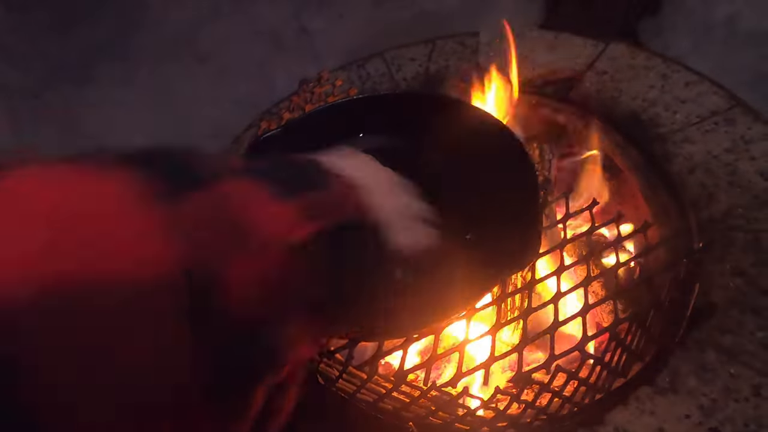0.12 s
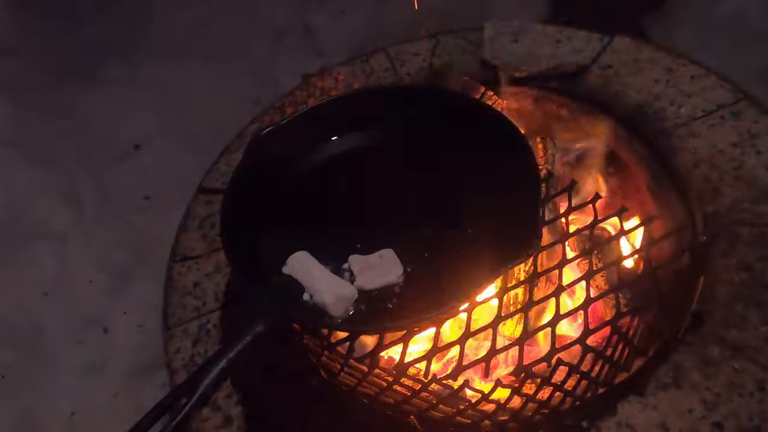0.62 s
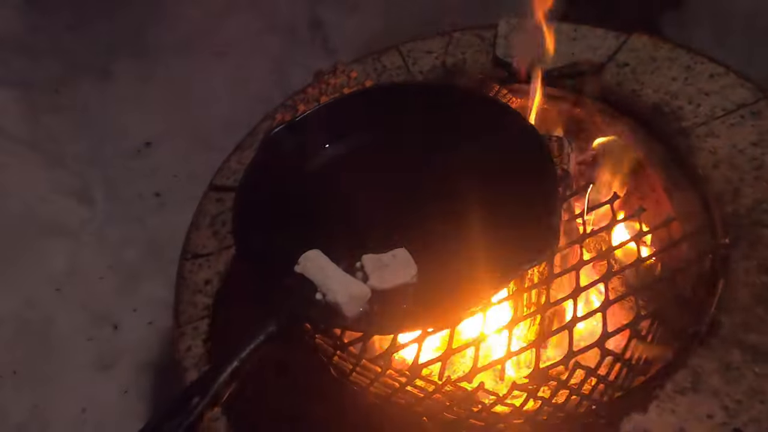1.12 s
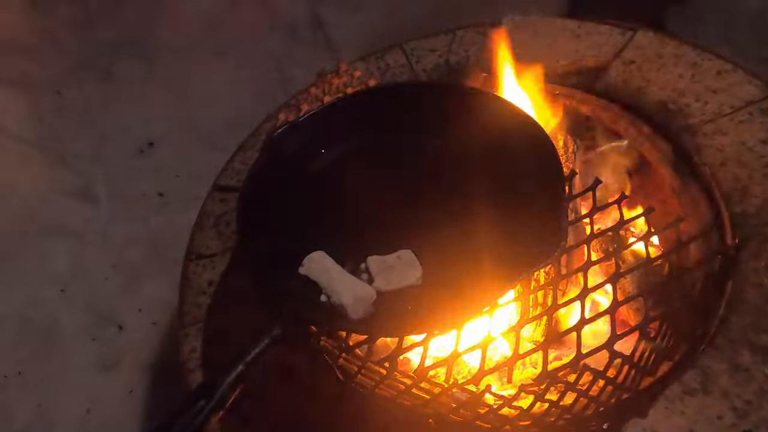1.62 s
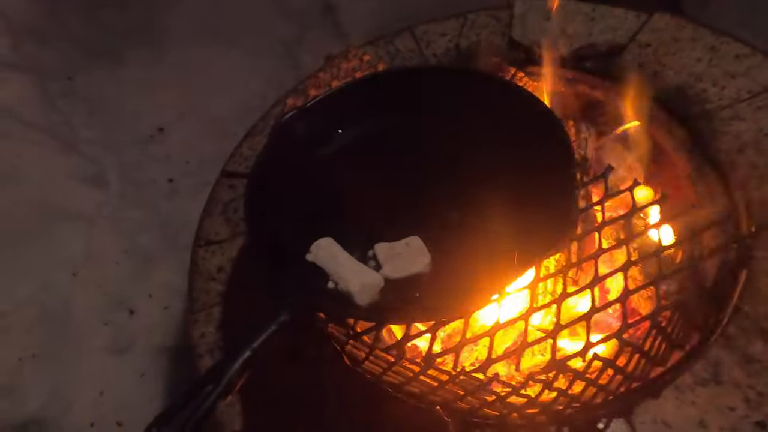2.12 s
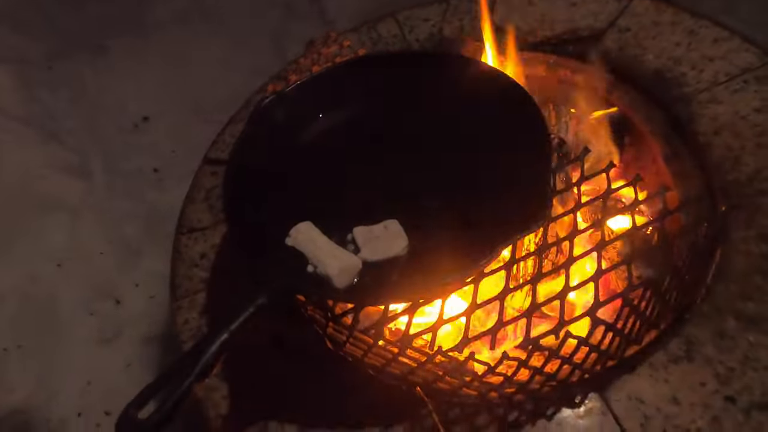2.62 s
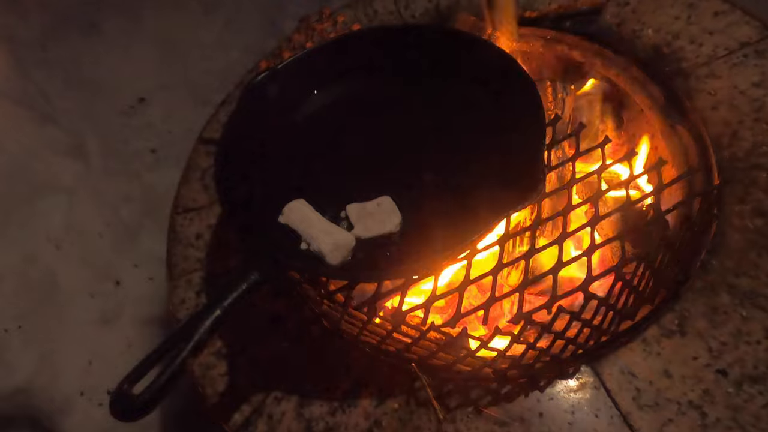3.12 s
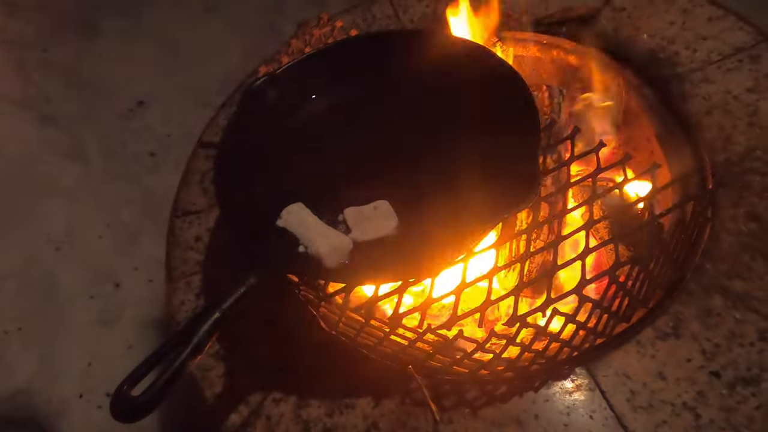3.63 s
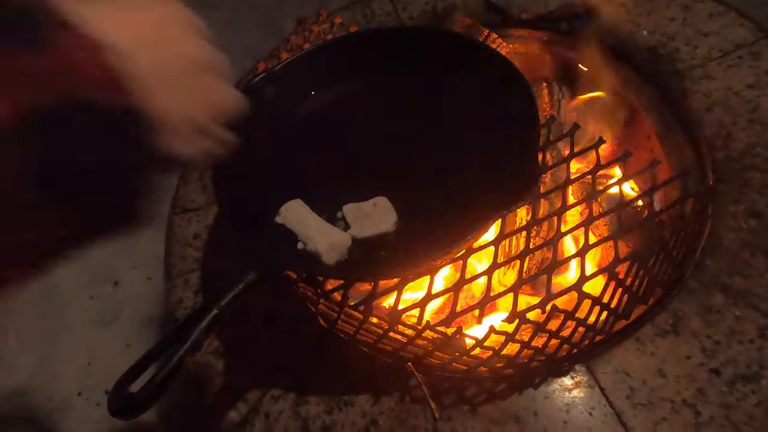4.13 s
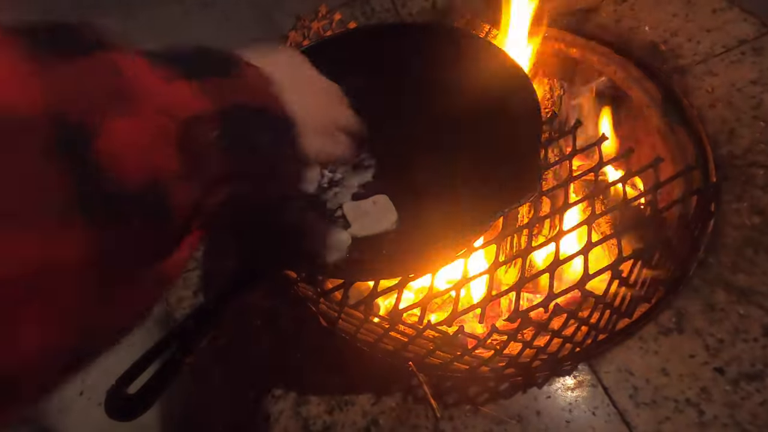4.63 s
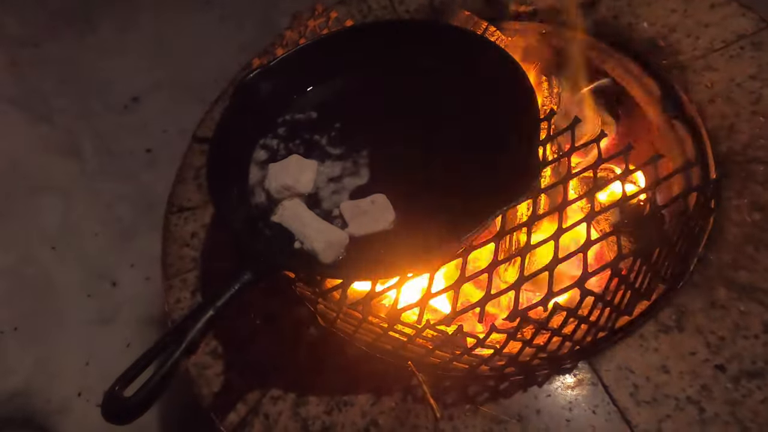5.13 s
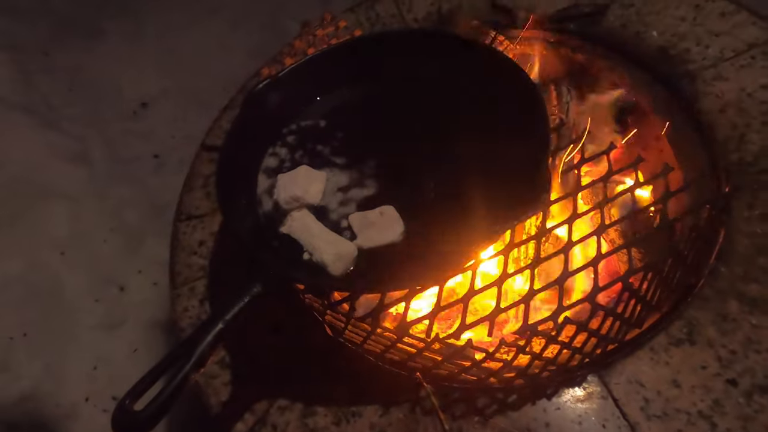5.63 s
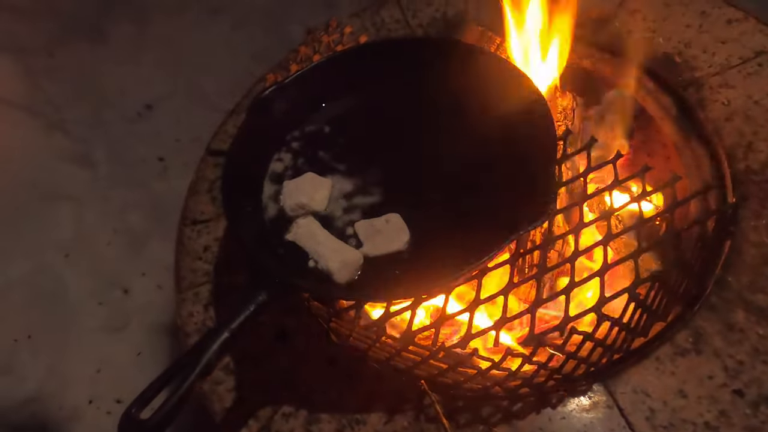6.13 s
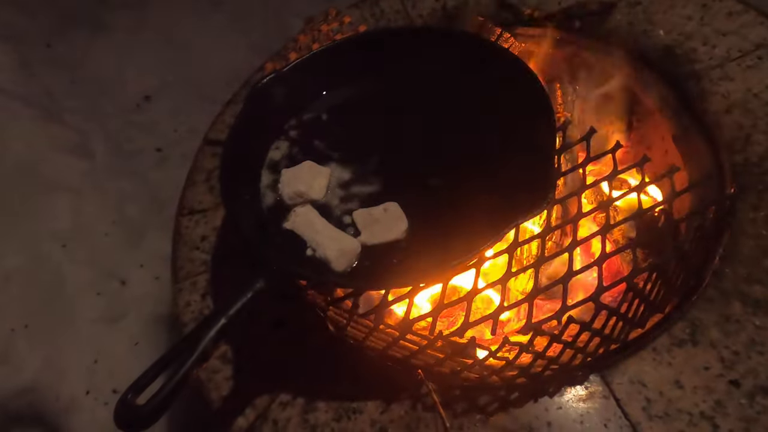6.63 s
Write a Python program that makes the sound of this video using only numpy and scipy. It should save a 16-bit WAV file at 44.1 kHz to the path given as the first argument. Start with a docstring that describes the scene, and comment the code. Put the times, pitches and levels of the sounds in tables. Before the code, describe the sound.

Close, dry outdoor fire pit with an iron pan of fat on the grate. After a quiet start, sharp log snaps burst out thickly around half a second to two seconds, thin to a sputtering sizzle, then crowd again just after five seconds. Flames flutter and roar softly underneath. The stereo picture begins narrow and widens.

```python
"""Logs snap and spit in a wood fire in an outdoor stone pit, heard dry, without echo, on a microphone pair.
Snaps are short noise bursts in bands, listed or at random, over a bed of grainy noise that swells now and then.
Fat sizzles in an iron pan on the grate: hissing noise and ringing droplets, with faint pan resonances.
Flames flutter and roar low as filtered noise, and one small metal part pings as decaying sines.
The stereo picture starts narrow and opens up."""
import sys
import numpy as np
from scipy import signal
from scipy.fft import rfft, irfft
from scipy.io import wavfile

SR = 44100
rng = np.random.default_rng(int(sys.argv[2]) if len(sys.argv) > 2 else 0)


def int16_out(signal):
    """Quantize to a 16-bit WAV file."""
    q = np.round(np.clip(np.atleast_2d(signal).T, -1, 1) * 32767)
    wavfile.write(sys.argv[1], SR, q.astype(np.int16))


def volts(x):
    """Linear amplitude factor 10**(x/20) for a level x in dB, scalar or array-like."""
    e = np.asarray(x, float) / 20
    return 10 ** e


N = 297675  # samples

SMALL_PER_S = 9
SMALL_OCTAVES, SMALL_FALL_DB, SMALL_LENGTHS = (0.9, 1.87), 7.5, (0.83, 4.0)
CALM_DB = -6.5  # small snaps lose this much when the bed is even


def small_snaps(vigour_db, unrest):
    """Rows of chance snaps, as loud as the fire is lively and fitful; columns as in LOUD_SNAPS."""
    when, size, colour, length = rng.random((int(SMALL_PER_S * N / SR), 4)).T
    bed_db = vigour_db + CALM_DB * (1 - unrest)
    level_db = bed_db[(when * N).astype(int)] + 0.5 + 0.5 * np.log(1 - .95 * size)
    octave = np.interp(colour, (0, 1), SMALL_OCTAVES)
    fall_db = np.full(len(when), SMALL_FALL_DB)
    lengths = np.interp(length ** 2, (0, 1), SMALL_LENGTHS)  # mostly short
    return list(zip(when * N / SR, level_db, octave, fall_db, lengths))


# The loud snaps of the logs. Each row: start in seconds, level at the colour centre in dB (energy as rms over
# 10 ms), colour centre in octaves above 1 kHz (kept within the bands), fall one octave away in dB (at least
# 0.5), length figure (nominal ms; sets the rise and, through a power, the decay).
LOUD_SNAPS = [(0.0804, -51.0, 1.8, 3.5, 3.2), (0.09, -53.5, 1.2, 2, 4.6), (0.2285, -48, 1.25, 12, 5.2),
              (0.3286, -48.5, -0.5, 1.5, 3.5), (0.3703, -49, 1.5, 8, 9.5), (0.4044, -55, 1.9, 3, 2.4),
              (0.4123, -68, 5, -3, 5.6), (0.4798, -55.5, 0.5, 1, 2), (0.5247, -54, 0.5, 3.5, 6.7),
              (0.5793, -49, 0.7, 1, 6.8), (0.6005, -42, 1.2, 2, 11), (0.6176, -38.5, -0.1, 2, 5),
              (0.6491, -38, 1.0, 2.0, 8.3), (0.6637, -33, -0.5, 3, 7.2), (0.708, -38, 2, 12.5, 3.5),
              (0.7446, -44.5, 0.6, 1.5, 7.2), (0.7896, -52, -1, -0.5, 5.1), (0.8072, -42, 0.1, 1.5, 7.3),
              (0.8155, -51.5, 2, 3.0, 3.4), (0.824, -59, 0.1, -1, 5.8), (0.9051, -44, -3.5, -2.5, 12),
              (0.915, -39.5, 1.5, 1, 3.9), (0.925, -40.0, 0.5, 2, 3.4), (0.9555, -51, 0, 5.0, 3.9),
              (0.9706, -36, -0.26, 9, 3.3), (0.9794, -50, -1.5, 1.5, 12), (0.9854, -45, 2.6, 1.5, 4.5),
              (1.0232, -48.5, 1, 2, 5.0), (1.0885, -27.5, -0.57, 1.5, 2.9), (1.097, -37.5, 1, 2, 5.4),
              (1.1121, -53, 2.3, 5, 5.9), (1.1212, -38.5, 1.2, 1.5, 7.6), (1.1322, -55, -2, 4.5, 7.7),
              (1.1425, -43, -1, 3.5, 3), (1.1579, -30.5, 0.5, 2, 5.5), (1.18, -44.5, -0.3, 0.5, 9.1),
              (1.2734, -45.5, 0.5, 2.5, 3.8), (1.2946, -46.5, -0.3, 0.5, 3.3), (1.3059, -47, -1.3, 1, 1.7),
              (1.3131, -46, 1.3, 2.0, 3.3), (1.3223, -49, -0.5, 3, 2.1), (1.3306, -42.5, 0.5, 1, 3.8),
              (1.3548, -50, 2.6, 5, 2.4), (1.4214, -45.5, 0.3, 2.5, 4.4), (1.4495, -33.5, 0.5, 1.0, 5),
              (1.4789, -42.5, 0.5, 6.0, 3.3), (1.4938, -39.5, -0.5, 6.5, 4.4), (1.5129, -36, 1.3, 2.5, 3.7),
              (1.5272, -49, 1.2, 2, 2.8), (1.551, -41.5, 1.6, 2, 3.4), (1.5575, -37.5, 1.24, 5, 2.2),
              (1.5748, -53, 1.8, 5.0, 2.8), (1.5812, -47, 0, 2, 3.2), (1.6021, -43.5, -0.5, 3.5, 8.8),
              (1.6118, -51, 1.5, 2.5, 4.5), (1.6204, -52.5, 2.0, 1.5, 2.5), (1.6275, -55.5, 1.0, 2, 2.2),
              (1.6467, -48, 1.5, 4, 5.1), (1.6778, -49.5, 1.0, 2, 4.2), (1.6912, -50, 0.2, 1.5, 4.7),
              (1.7165, -41, 2, 6, 9.8), (1.7524, -49.5, 0, 4, 3.5), (1.7601, -59, 3.1, 3, 1.5),
              (1.8206, -46, 1.5, 2, 2.8), (1.8279, -55, 0.5, -2, 2.5), (1.8511, -54.0, 1.9, 12, 5.8),
              (1.8583, -48, 1.5, 8, 3.6), (1.8782, -59, 4.5, 6, 2.2), (1.9008, -44.5, -0.3, 2, 4.7),
              (1.912, -47, 1.5, 9, 1.9), (1.9213, -54, 0.3, 1.5, 1.5), (1.9311, -41.5, 1.55, 6.5, 3.4),
              (1.9394, -46.0, 2.1, 7, 6.7), (1.9676, -52, 1, 8, 2.7), (1.98, -56.0, 2.4, 9, 2.7),
              (2.0151, -44, 1.54, 3.5, 2.4), (2.023, -57.5, 1.2, 0.5, 3.1), (2.0484, -68.0, 3.2, 7, 2.3),
              (2.0595, -49, 3.2, 3.5, 3.2), (2.0756, -62, 2.6, 1.0, 2.6), (2.111, -47.5, 1.5, 2.5, 5.5),
              (2.1176, -56, 1, 9, 5.8), (2.1597, -34, 1.0, 3, 4.2), (2.2008, -56, 0.1, 1.5, 3.7),
              (2.238, -46, 0.5, 3.5, 3.1), (2.269, -57, 1.1, 4.5, 2.9), (2.285, -49, 1.04, 5, 2.1),
              (2.3076, -49.0, 1.1, 3, 3.1), (2.3191, -56, 1.5, 4, 5.9), (2.3714, -50.5, 0.5, 2, 3.6),
              (2.3824, -64, 2, 0, 2.9), (2.413, -44, 1.73, 8.5, 2.8), (2.4379, -53, -0.1, 0.5, 3.6),
              (2.4552, -41.5, 1.8, 1, 3.1), (2.4934, -62, 3.2, 3, 2.5), (2.5159, -53, 3.1, 4.0, 2.8),
              (2.5529, -58, -1, 6, 2.9), (2.5617, -51.5, 0.0, 1.5, 2.9), (2.5879, -57, -5, 3, 2.9),
              (2.6035, -44, 1.9, 5, 3.9), (2.6851, -55.5, 0.1, 2.5, 3.2), (2.7301, -59.0, 2, 1, 8.7),
              (3.0552, -52, 1.3, 6, 3.9), (3.063, -56, 1.7, 6, 4.8), (3.0731, -44, 1.3, 3.5, 7.9),
              (3.0783, -40, 1.45, 5.5, 7.8), (3.0904, -49, -6, 4, 8.6), (3.1078, -41.5, -0.1, 1, 6.9),
              (3.1435, -48, 0, 2, 6.8), (3.1785, -52.5, 0.5, 1, 3.0), (3.2783, -47.0, -0.2, 2.5, 7.2),
              (3.4176, -45.0, 0.5, 4, 4.4), (3.5283, -56.5, 4, 1.0, 8.1), (3.5609, -48, -3, 0.5, 7),
              (3.6117, -54.5, 1.5, 1, 4.8), (3.703, -49.5, 1.5, 4, 6.8), (3.7568, -63, 5.5, 4, 3),
              (3.792, -54.5, 1.7, 8, 3.4), (3.8468, -48.5, 1.45, 6.5, 4.4), (3.9495, -55.5, 1.7, 5.5, 5.7),
              (4.1964, -52, 7, 1, 6.3), (4.2098, -54.5, -0.3, 4, 7.3), (4.2653, -63, 3.2, -1.5, 2.2),
              (4.4722, -52.0, 0.6, 2.5, 9), (4.6522, -52.5, 1.5, 2, 3.8), (4.6598, -61.0, 2.9, 2.0, 6.3),
              (4.6662, -59, 3.2, 0.5, 6), (4.6807, -58.0, -1.0, 4, 2.1), (4.69, -55.5, 7, 1, 4.2),
              (4.7494, -37.5, 1.75, 9, 3.3), (4.7847, -50, 2.2, 3, 3.6), (4.8362, -52, 1.0, 1.5, 7.8),
              (4.86, -56, 2.5, 1.5, 11), (4.9492, -56.5, 1.5, -1.5, 10), (4.9662, -60, 6, 1.0, 7.4),
              (4.9937, -53, 6, 4, 11), (5.0092, -38, 0.0, 2.5, 4.2), (5.0661, -46, 1.2, 8, 9.7),
              (5.0985, -40, 1.5, 6, 11), (5.1241, -41, 1.6, 4, 7.2), (5.1505, -46, 1, 5, 4.3),
              (5.1573, -52, 0.5, 6, 3.1), (5.1893, -40, 0.7, 3.5, 4.2), (5.2011, -41, 2.8, 12, 13.8),
              (5.2093, -48, -0.8, -3, 9.7), (5.2438, -50, -7, 1, 6.8), (5.2503, -37.5, 0.5, 1, 10),
              (5.2582, -45, 0, 11, 5.8), (5.2862, -45.5, -1.2, 2, 3.2), (5.3025, -51.0, 1.7, 10, 3.6),
              (5.339, -42, 1.55, 10, 5.9), (5.3669, -42, 2.1, 11, 4.5), (5.4294, -44.5, 0.7, 2, 2.7),
              (5.4591, -37, 0.57, 3.5, 6.7), (5.5026, -49.5, -0.5, 0.5, 4.7), (5.5359, -43, 2.5, 12.5, 1.6),
              (5.5691, -52, 3, 5, 2.1), (5.618, -53, 0.1, 2, 3.1), (5.7437, -53.5, 3.2, 17, 3.2),
              (5.781, -43.5, -0.5, 3.5, 4.6), (5.8852, -57, 3.5, 1.5, 1.2), (5.9222, -44, 1.5, 12, 1.1),
              (5.9396, -60, 2.0, 3.0, 6.7), (6.0277, -57.5, 2, 2, 1.3), (6.0484, -54.5, 1.9, 6, 3.5),
              (6.128, -43, 0.52, 2.5, 4), (6.3725, -47.5, 0.9, 6, 3.0), (6.4056, -52, 0.5, 8, 1.6),
              (6.4122, -43, -0.3, 12, 2.3), (6.4429, -45.5, 0.3, 9, 3.3), (6.45, -54, 7, 1.0, 2.1),
              (6.459, -53, 1.5, 6, 4.5), (6.5053, -47.5, 1, 10, 5.9), (6.6191, -45.5, 3.2, 8.5, 0.92),
              (6.7425, -46.5, 1.5, 1.5, 3)]
# The bands of a snap's body. Each row: lower edge in Hz, upper edge in Hz.
SNAP_BANDS_HZ = [(170, 700), (900, 2400), (2400, 6000), (6000, 11500)]
EDGE_BAND_HZ, EDGE_DB = (11500, 15500), -24  # sharp edge of a snap, relative to its highest body band
FALL_CURVE = 1.96  # the fall steepens away from the centre
TILT_HZ, DULL_HZ = 4040, 8150  # snaps fall off gently, then faster
KNOCK_HZ, KNOCK_WIDTH_HZ, KNOCK_GAIN = 1490, 360, 2.6  # hollow of the pit under the pan


def log_snaps(rows):
    """Each snap is a short cluster of fibre breaks, dying fast, in bands that fall away from its colour."""
    size, chunk = 2200, 20  # samples
    t_ms = np.arange(size) * 1000 / SR
    start_s, db, centre, fall_db, length = np.transpose(rows)[:, :, None, None]

    octaves = np.log2(np.sqrt(np.prod(SNAP_BANDS_HZ, axis=1)) / 1000)
    centre = np.clip(centre, octaves[0], octaves[-1])
    fall_db = np.maximum(fall_db, .5)
    levels_db = [db - fall_db * np.abs(octave - centre) ** FALL_CURVE for octave in octaves]
    levels_db.append(levels_db[-1] + EDGE_DB)

    white = rng.standard_normal((len(rows), 2, size))
    rough_db = 2.5 * rng.exponential(1, (len(rows), 1, size // chunk))
    breaks = volts(rough_db).repeat(chunk, axis=2)
    decay_ms = 0.58 * length ** 1.344  # short snaps are drier still
    shape = (1 - np.exp(-t_ms / (0.026 * length))) * np.exp(-t_ms / decay_ms)
    first_break = 1 + 2.2 * np.exp(-t_ms / 0.14)  # the first break is the hardest
    burst = white * breaks * shape * first_break

    tilt = signal.butter(1, TILT_HZ, fs=SR, output="sos")
    dull = signal.butter(2, DULL_HZ, fs=SR, output="sos")
    burst = signal.sosfilt(tilt, burst + 1e-18)
    dulled = signal.sosfilt(dull, burst)
    parts = [band_pass(dulled, band) for band in SNAP_BANDS_HZ]
    parts.append(band_pass(burst, EDGE_BAND_HZ))
    parts[1] = parts[1] + KNOCK_GAIN * resonate(parts[1], KNOCK_HZ, KNOCK_WIDTH_HZ)
    parts[3:] = [part * np.exp(-0.033 * t_ms / decay_ms) for part in parts[3:]]  # the treble dies first

    whole = 0
    for part, level_db in zip(parts, levels_db):
        rms_10ms = np.sqrt(np.sum(part ** 2, axis=2, keepdims=True) / (SR / 100))
        whole = whole + volts(level_db) * part / rms_10ms
    out = np.zeros((2, N + size))
    for at, snap in zip(np.round(start_s.ravel() * SR).astype(int), whole):
        out[:, at:at + size] += snap
    return out[:, :N]


# How lively the burning and frying is. Each row: time in seconds, vigour in dB, brightness in dB.
VIGOUR = [(0.0, -74.5, -2), (0.19, -65, -0.5), (0.25, -59, 3), (0.31, -56, -0.5), (0.4, -53.5, 1.5),
          (0.49, -56.5, 0), (0.55, -44.5, 2), (0.63, -49.5, 0), (0.67, -51, -1.5), (0.8, -46.5, 3.5),
          (0.88, -51.5, -3.5), (1.0, -54.5, 1.5), (1.05, -54.5, -1.5), (1.12, -44, -1.5), (1.25, -58.5, 3),
          (1.31, -47, -3), (1.39, -57.0, 2), (1.54, -52.5, -3.5), (1.88, -58.5, 1.5), (1.93, -53.5, -4.5),
          (2.03, -66.5, 3), (2.08, -66, 2), (2.15, -55.5, -0.5), (2.23, -62.5, -3), (2.29, -59.5, -0.6),
          (2.37, -65, -3), (2.45, -58, 1.2), (2.49, -70.5, 4.5), (2.59, -51.5, 0.1), (2.7, -66, 0.1),
          (2.76, -65.5, -3), (2.83, -68, 1), (2.9, -55.5, 0), (2.93, -58, 4.5), (2.97, -69.5, -1),
          (3.01, -71.0, 1.2), (3.05, -68, -2), (3.08, -54, 0.1), (3.1, -52, 4), (3.15, -54.5, -0.4),
          (3.31, -48.5, 2.2), (3.46, -57.5, -2), (3.6, -55.5, 2.5), (3.66, -60, 0.2), (3.82, -60.5, 1.5),
          (4.11, -65, 1.5), (4.23, -58.5, -0.5), (4.59, -57.0, -1), (4.72, -64, 3), (4.81, -55, 4),
          (5.05, -54.5, 1.5), (5.12, -48, 1.5), (5.23, -45.5, 3.8), (5.38, -49, 0.0), (5.52, -57, -1),
          (5.75, -64, 3), (5.9, -59.0, 4), (5.99, -66.5, 1.0), (6.05, -54.5, 1.5), (6.1, -61.5, -2),
          (6.14, -53.5, 1.5), (6.2, -65, 4.5), (6.3, -63, 2.5), (6.48, -55.5, -1), (6.71, -70.5, 3.5),
          (6.75, -56, 2.2)]
REFERENCE_VIGOUR_DB = -57


def fire_vigour():
    """Vigour and brightness of the burning and frying, one value per sample."""
    return in_time(VIGOUR)


def follow(vigour_db, bright_db, level_db, swing, brightness):
    """Layer level: dB at the reference vigour, plus shares of the vigour's swing and of the brightness."""
    return level_db + swing * (vigour_db - REFERENCE_VIGOUR_DB) + brightness * bright_db


# How fitful the bed is, from an even wash to hard sputtering. Each row: time in seconds, unrest from 0 to 1.
UNREST = [(0, 0.1), (.5, 0.27), (1.0, 1), (2.7, 1), (3.3, 0.36), (4.2, 0.8), (4.65, 0.6), (5.1, .95),
          (5.6, 0.93), (6.75, 1)]


def bed_unrest():
    """Fitfulness of the bed, one value per sample."""
    return np.clip(in_time(UNREST)[0], 0, 1)


# Colour of the crackle bed. Each row: frequency in Hz, relative level in dB per Hz.
EMBERS = [(600, -10), (900, -10.5), (1100, -6), (1500, -6), (2200, -9.5), (3000, -8), (4500, -14)]


def ember_crackle(level_db, coarse, fine, unrest):
    """Grainy noise for the fine crackle of the embers."""
    return volts(level_db) * bed(EMBERS, coarse * np.sqrt(fine), patchy_db=2.66 * unrest, rate=7.7)


def ember_droplets(level_db):
    """Bursting droplets that ring through the middle range."""
    return volts(level_db) * spits(per_s=200.0, spread_db=9.0, low_hz=994, high_hz=2900, cycles=57.0)


# Colour of the frying fat. Each row: frequency in Hz, relative level in dB per Hz.
SIZZLE = [(1800, -30), (3000, -7.5), (4600, 0.5), (6200, -3.5), (8000, -4.5), (10000, -16), (12500, -58)]


def fat_sizzle(level_db, coarse, fine, unrest):
    """Frying fat as fine grainy noise."""
    return volts(level_db) * bed(SIZZLE, fine * np.sqrt(coarse), patchy_db=3.9 * unrest, rate=26.0)


def fat_droplets(level_db):
    """Bursting droplets that ring higher and for fewer cycles than those of the embers."""
    return volts(level_db) * spits(per_s=350.0, spread_db=7.0, low_hz=2765, high_hz=8900, cycles=30.0)


# Resonances of the iron pan. Each row: frequency in Hz, width in Hz, relative level in dB.
PAN = [(1400, 70, -3), (2010, 110, 0), (2600, 90, -3), (3300, 90, -5)]
PAN_STRUCK_DB = -14  # how strongly the snaps drive the pan


def pan_singing(level_db, coarse, snaps):
    """The frying and the snaps drive the pan's resonances in parallel."""
    frying = volts(level_db) * coarse * rng.standard_normal((2, N))
    drive = frying + volts(PAN_STRUCK_DB) * snaps
    return sum(volts(db) * resonate(drive, hz, width_hz) for hz, width_hz, db in PAN)


# The small metal part. Each row: mode in Hz, relative level in dB, time to fall 60 dB in seconds.
PING_MODES = [(4120, 1.5, 0.12), (5170, -23, .1)]
PING_S, PING_DB = .2285, -42


def metal_ping():
    """One tap sets the metal modes ringing as decaying sines."""
    t = np.maximum(np.arange(N) / SR - PING_S, 0)
    out = 0
    for hz, db, t60_s in PING_MODES:
        out = out + volts(PING_DB + db - 60 * t / t60_s) * np.sin(2 * np.pi * hz * t)
    return out


# The flaps of the flame. Each row: start in seconds, length in seconds, level in dB before lumps.
FLAPS = [(0.314, 0.051, -59), (0.577, 0.12, -51), (0.745, 0.078, -52), (1.079, 0.11, -54),
         (1.275, 0.03, -61), (1.687, 0.039, -55), (1.743, 0.076, -55), (2.144, 0.029, -47),
         (2.438, 0.051, -56), (2.597, 0.06, -58.5), (2.959, 0.061, -64), (3.02, 0.094, -66),
         (3.137, 0.125, -49.5), (3.304, 0.13, -56), (3.481, 0.033, -59), (3.7, 0.024, -44),
         (3.748, 0.12, -60), (3.907, 0.019, -52.5), (4.018, 0.057, -62), (4.078, 0.06, -63),
         (4.554, 0.14, -61), (4.7, 0.051, -60), (5.113, 0.21, -46.5), (5.45, 0.058, -52.5),
         (5.82, 0.07, -56), (6.119, 0.033, -57), (6.255, 0.053, -54), (6.388, 0.18, -55.5)]
FLAP_EDGE_S = 0.024


def flame_flaps():
    """Envelope of the flaps: soft rise, hold, soft fall, made lumpy by a chance drift."""
    t, out = np.arange(N) / SR, 0
    for start_s, length_s, db in FLAPS:
        inside_s = np.minimum(t - start_s, start_s + length_s - t)
        out = out + volts(db) * np.clip(inside_s / FLAP_EDGE_S + .5, 0, 1) ** 2
    return out * volts(4.5 * drift(27))


# Colour of the low flutter. Each row: frequency in Hz, relative level in dB per Hz.
FLUTTER = [(12, -35), (20, 2.5), (45, -0.5), (62, -3.5), (90, -24)]
FLUTTER_DB = -62.5


def flame_flutter(flap):
    """Very low noise at a steady base level, raised by each flap."""
    return (volts(FLUTTER_DB) + flap) * bed(FLUTTER, 1, patchy_db=1.5, rate=8.0)


# Colour of the roar. Each row: frequency in Hz, relative level in dB per Hz.
ROAR = [(50, -23), (72, 0.5), (100, -4), (155, 2), (250, -6.5), (400, -18)]
FLAP_ROAR_DB, FLAP_ROAR_GROWTH = -5, 0.39


def flame_roar(level_db, coarse, flap):
    """Low noise that follows the fire; strong flaps roar more than in proportion."""
    flap_roar = volts(FLAP_ROAR_DB) * flap * (flap / volts(-52)) ** FLAP_ROAR_GROWTH
    return (volts(level_db) + flap_roar) * bed(ROAR, np.sqrt(coarse), patchy_db=2.5, rate=34.0)


# Colour of the rustle. Each row: frequency in Hz, relative level in dB per Hz.
RUSTLE = [(180, -1.5), (300, 6), (500, 3), (800, -19), (1200, -47)]


def rustle(level_db, coarse):
    """Coarse-grained noise between the roar and the crackle."""
    return volts(level_db) * bed(RUSTLE, coarse, patchy_db=1.5, rate=7.7)


# Colour of the highest hiss. Each row: frequency in Hz, relative level in dB per Hz.
TOP_HISS = [(8000, -1.5), (10000, 0), (12400, 1), (14500, -8), (15700, -16), (16200, -51)]


def top_hiss(level_db, fine):
    """Faint fine-grained noise in the highest treble."""
    return volts(level_db) * bed(TOP_HISS, fine, patchy_db=3.0, rate=33.0)


def bed(spectrum, envelope, patchy_db, rate):
    """Two twin draws of enveloped noise, rms 1; overlapping half-octave patches flicker on their own."""
    hz, out = bins_hz(), 0
    low, high = spectrum[0][0], spectrum[-1][0]
    spectra = rfft(rng.standard_normal((2, N)) * envelope)
    spectra = spectra * volts(at_hz(spectrum, hz)) * (hz > low) * (hz < high)
    count = 1 + int(np.ceil(2 * np.log2(high / low)))
    place = (count - 1) * np.log(hz / low) / np.log(high / low)
    for k in range(count):
        patch = irfft(spectra * np.maximum(1 - np.abs(place - k), 0), N)
        out = out + patch * volts(patchy_db * drift(rate))
    return rms_one(out)


def spits(per_s, spread_db, low_hz, high_hz, cycles):
    """Droplets of fat and sap burst at random, each at one of ten pitches, falling 60 dB in so many cycles."""
    born = rng.random(N) < per_s * volts(4.0 * drift(8.0)) / SR
    sizes_db = spread_db * np.minimum(rng.exponential(1, N), 3)
    hits = born * volts(sizes_db) * rng.standard_normal((2, N))
    dealt, out = rng.integers(0, 10, N), 0
    for k, hz in enumerate(np.geomspace(low_hz, high_hz, 10)):
        r, w = volts(-60 * hz / (cycles * SR)), 2 * np.pi * hz / SR
        mine = hits * (dealt == k) + 1e-18
        out = out + signal.lfilter([0, np.sin(w)], [1, -2 * r * np.cos(w), r * r], mine)
    return rms_one(out)


def grains(per_s, spread_db, grain_ms, hiss_db):
    """Envelope of tiny bursts at random moments, few large and many small, over an even hiss."""
    born = rng.random(N) < per_s / SR
    power = born * volts(2 * spread_db * np.minimum(rng.exponential(1, N), 3))
    fade = np.exp(-1000 / (grain_ms * SR))
    power = signal.lfilter([1], [1, -fade], power)
    return np.sqrt(power / power.mean() + volts(2 * hiss_db))


def drift(rate):
    """Slow chance of spread 1 that turns about rate times a second, drawn at every 40th sample."""
    r = np.exp(-80 * np.pi * rate / SR)
    slow = signal.lfilter([1], [1, -2 * r, r * r], rng.standard_normal(N // 40 + 2002))[2000:]
    return np.interp(np.arange(N) / 40, np.arange(len(slow)), rms_one(slow))


def resonate(x, hz, width_hz):
    """A two-pole resonance with a gain near 1 at its peak."""
    r, w = np.exp(-np.pi * width_hz / SR), 2 * np.pi * hz / SR
    return (1 - r * r) / 2 * signal.lfilter([1, 0, -1], [1, -2 * r * np.cos(w), r * r], x)


def band_pass(x, band_hz):
    """Keep one band of a sound."""
    return signal.sosfilt(signal.butter(3, band_hz, "band", fs=SR, output="sos"), x)


def rms_one(x):
    """Scale to rms 1."""
    return x / np.sqrt(np.mean(x ** 2) + 1e-20)


def in_time(rows):
    """Columns of a curve table, one value per sample."""
    s, *columns = np.transpose(rows)
    return [np.interp(np.arange(N) / SR, s, c) for c in columns]


def at_hz(points, hz):
    """Read a spectrum on a log-frequency axis."""
    point_hz, value = np.transpose(points)
    return np.interp(np.log(hz), np.log(point_hz), value)


def bins_hz():
    """Frequency of every bin, at least 1 Hz."""
    return np.maximum(np.fft.rfftfreq(N, 1 / SR), 1)


# Width at the microphone pair. Each row: frequency in Hz, gain of the unrelated side share in dB.
SPREAD = [(60, -12), (110, -8.5), (200, -7), (380, -11.5), (700, -10.5), (1290, -13.5), (2380, -10),
          (4400, -6), (8120, -0.5), (15000, -1)]
# Balance of the microphone pair. Each row: frequency in Hz, left minus right in dB (the tip is halved below
# the limit).
LEAN = [(60, -1), (110, 0.5), (200, -2.5), (380, 0), (700, 2), (1290, 2.0), (2380, 3.5), (4400, 1.5),
        (8120, -0.5), (15000, -5)]
# Opening of the stereo picture. Each row: time in seconds, gain of the side below the limit in dB.
OPENING = [(0, -19), (.9, -28.5), (1.2, -17.5), (1.9, -9), (2.7, -4), (3.1, -3.5), (4.1, 0.5), (4.8, 2),
           (5.1, -2.5), (5.6, 0), (6.75, 1.5)]
ALWAYS_WIDE_HZ = 11400  # the limit: above it the width does not move


def microphone_pair(mid, twin):
    """The side holds an unrelated share and a share of the mid that tips the balance."""
    hz = bins_hz()
    wide = hz > ALWAYS_WIDE_HZ
    ratio = volts(at_hz(LEAN, hz))
    tip = 2 * (ratio - 1) / (ratio + 1) * np.where(wide, 1, .5)
    side = rfft(twin) * volts(at_hz(SPREAD, hz)) + rfft(mid) * tip
    opening = irfft(side * ~wide, N) * volts(in_time(OPENING)[0])
    side = irfft(side * wide, N) + opening
    return np.array([mid + side, mid - side])


def scene():
    """Twin draws of every source, mixed and spread over the microphone pair."""
    vigour_db, bright_db = fire_vigour()
    unrest = bed_unrest()
    sputtering_db = vigour_db + unrest * 1.78 * drift(22)  # the whole bed sputters together
    flap = flame_flaps()
    fine = grains(per_s=1000.0, spread_db=26.0, grain_ms=1.0, hiss_db=10.0)
    coarse = grains(per_s=150.0, spread_db=2.5, grain_ms=0.74, hiss_db=4.0)

    # level at the reference vigour in dB, share of the vigour's swing, share of the brightness
    ember_db = follow(sputtering_db, bright_db, -60, 0.94, -0.48)
    sizzle_db = follow(sputtering_db, bright_db, -61.5, 0.71, 0.67)
    frying_db = follow(sputtering_db, bright_db, -51, 1.3, 0)
    roar_db = follow(sputtering_db, bright_db, -64.5, 0.23, -0.078)
    rustle_db = follow(sputtering_db, bright_db, -66, 1, -1.3)
    top_db = follow(sputtering_db, bright_db, -78.5, 0.57, 1)

    snaps = log_snaps(list(LOUD_SNAPS) + small_snaps(vigour_db, unrest))
    mix = snaps + metal_ping()
    mix = mix + pan_singing(frying_db, coarse, snaps)
    mix = mix + flame_flutter(flap)
    mix = mix + flame_roar(roar_db, coarse, flap)
    mix = mix + rustle(rustle_db, coarse)
    mix = mix + ember_droplets(ember_db - 18.5)
    mix = mix + fat_droplets(sizzle_db - 8.0)
    mix = mix + ember_crackle(ember_db, coarse, fine, unrest)
    mix = mix + fat_sizzle(sizzle_db, coarse, fine, unrest)
    mix = mix + top_hiss(top_db, fine)
    mid, twin = mix
    return microphone_pair(mid, twin)


def top_cut(x):
    """Nothing passes above the cut-off."""
    return signal.sosfilt(signal.butter(12, 16400, fs=SR, output="sos"), x)


def record(dry):
    """The finished mix of the microphone pair, as delivered."""
    return top_cut(dry)


dry = scene()
out = record(dry)
int16_out(out)
```